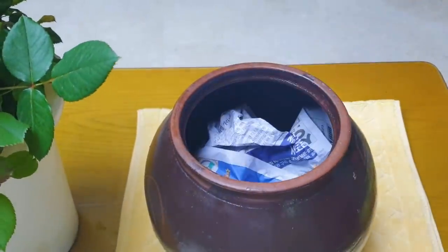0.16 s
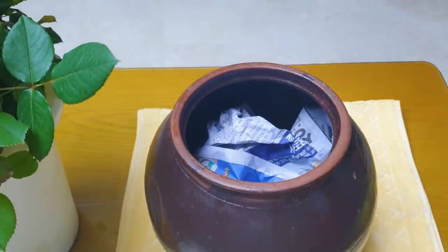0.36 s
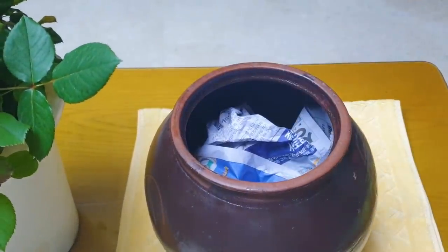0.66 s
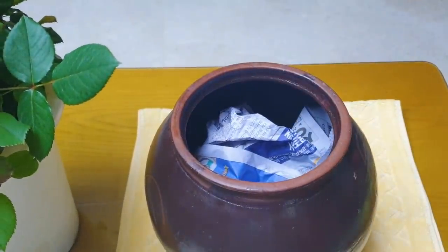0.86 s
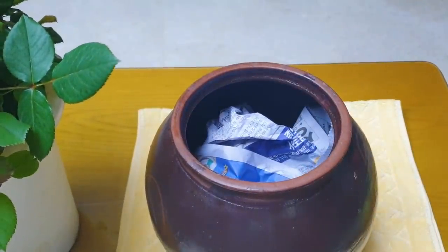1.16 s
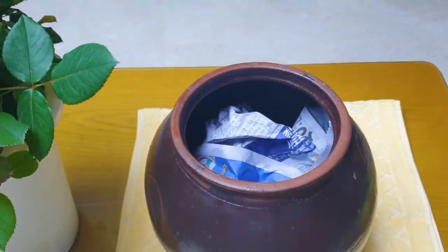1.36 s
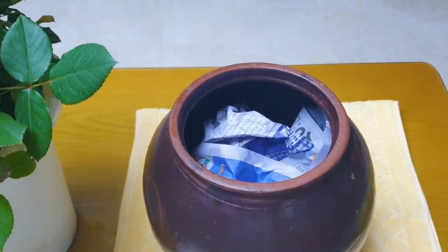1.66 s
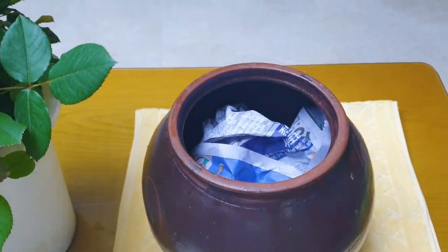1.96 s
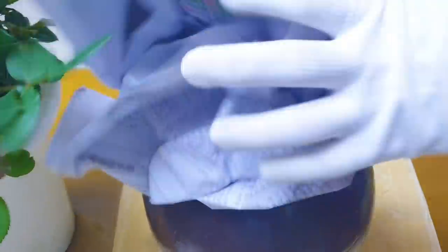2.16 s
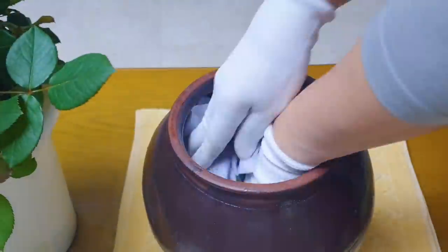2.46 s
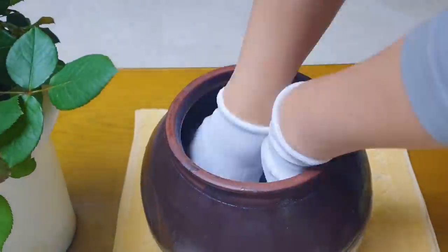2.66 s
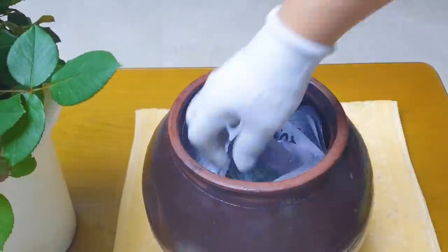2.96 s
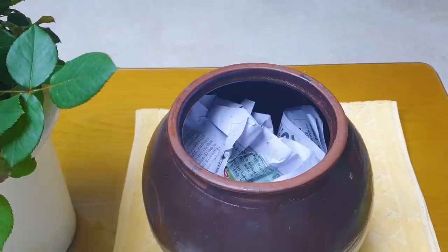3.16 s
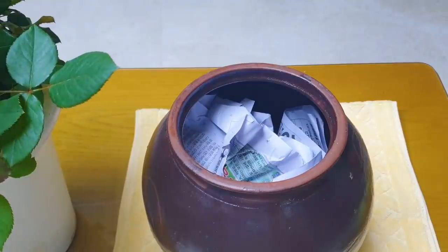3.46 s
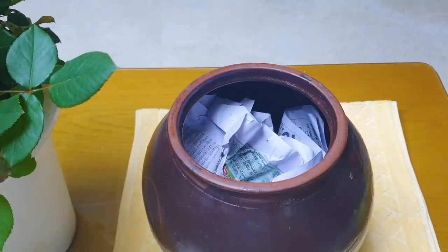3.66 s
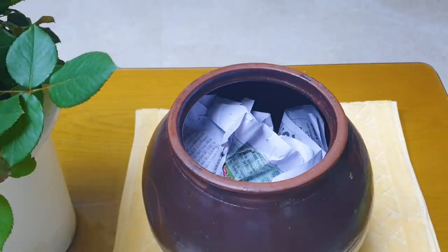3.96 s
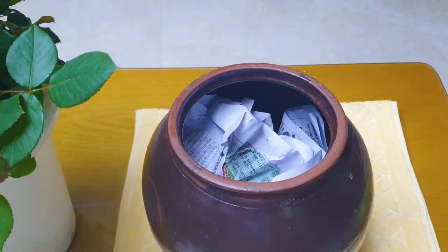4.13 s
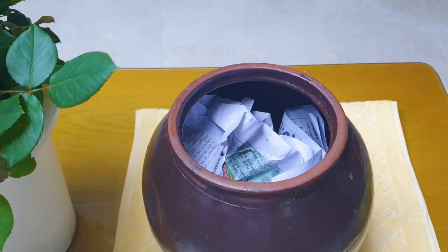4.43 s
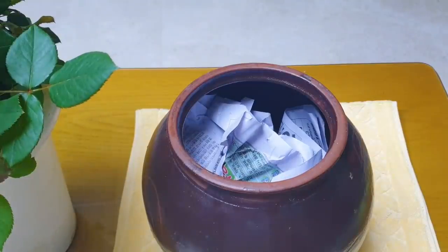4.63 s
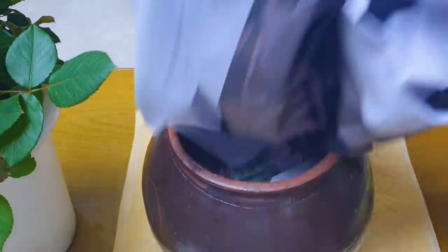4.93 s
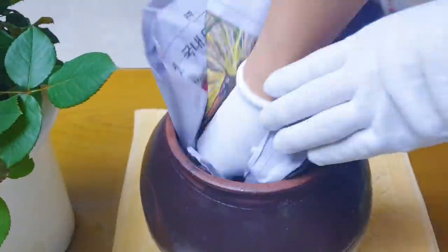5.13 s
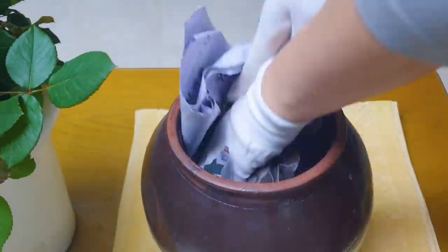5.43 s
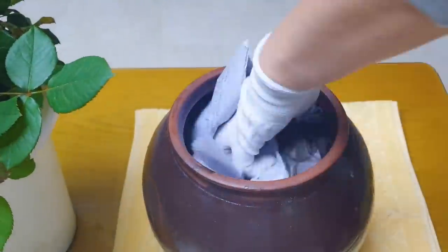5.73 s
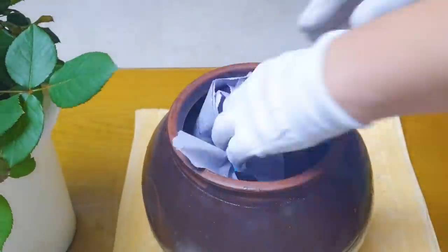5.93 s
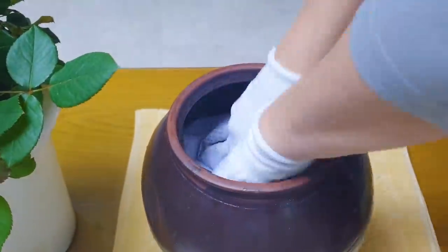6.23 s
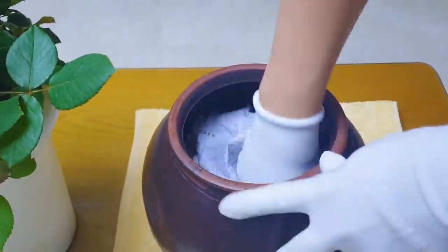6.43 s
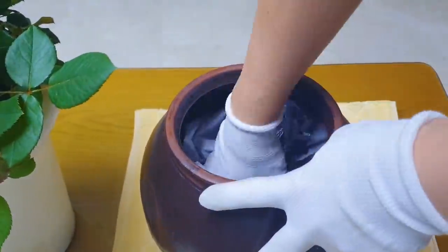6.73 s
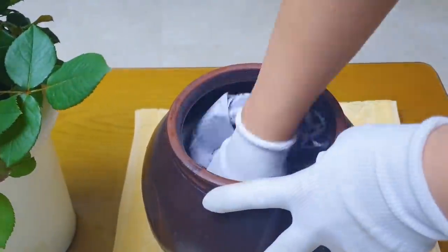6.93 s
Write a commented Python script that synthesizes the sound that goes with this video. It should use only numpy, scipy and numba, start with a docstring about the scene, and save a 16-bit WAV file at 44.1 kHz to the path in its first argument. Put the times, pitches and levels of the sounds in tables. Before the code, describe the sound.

A short, dull paper rustle with a soft hollow boom opens the sound, as a wad of damp newspaper settles in a ceramic jar. Small ticks follow over a faint hiss until about 1.2 seconds. From there hands crumple a sheet, the crisp crackle growing loud near 2 seconds. Between 2.1 and 3 seconds it is pushed into the jar in jerky, fading strokes, with hollow scrapes, sharp snaps and a few dull knocks. A lull with faint ticks lasts until about 3.6 seconds. A second sheet is then gathered and crushed, building from 4.2 seconds to the loudest crunch around 5 seconds, where it enters the jar with a few more bumps. Softer pushes, crinkles and hollow scraping continue until about 7 seconds. Everything is close to the microphone, in a quiet room with a very faint hum.

```python
"""Stuffing a jar with damp newspaper

Close up, gloved hands crumple damp newspaper into a glazed jar on a table. A pressed wad settles
with small ticks; two more sheets are gathered, crushed at the rim and pushed down. Creases buckle
as tiny grains, sheets slide and flap, and the jar's cavity colours what happens inside it."""
import sys
import numpy as np
from scipy import signal
from scipy.fft import rfft, irfft
from scipy.io import wavfile
from scipy.ndimage import map_coordinates
from numba import njit

SR = 44100
rng = np.random.default_rng(int(sys.argv[2]) if len(sys.argv) > 2 else 0)


def unload_wav(signal):
    """Save mono or channel-first audio to the path in sys.argv[1] as 16-bit WAV at rate SR, clipped to [-1, 1]."""
    wavfile.write(
        sys.argv[1],
        SR,
        np.round(np.clip(np.atleast_2d(signal).T, -1, 1) * 32767).astype(np.int16),
    )


N = 312880
TIME = np.arange(N) / SR
# Hands push paper into the jar. Each row: start and length in seconds, crease level and swell in dB,
# folds, flap and sheen in dB relative to the creases, cavity level in dB, cavity resonance in Hz
# (lower as the arms close the mouth).
PUSHES = [(2.145, 0.069, -20.5, 4, -7.5, -21.5, -3, -28, 673),
          (2.216, .15, -21, -3.5, -7, -22, -3.5, -32.5, 565),
          (2.373, .12, -25.5, -3.5, -12, -33, -0.5, -32.5, 660),
          (2.513, 0.068, -27.5, -9.5, -5, -32, 2.5, -36.5, 697),
          (2.586, 0.06, -36.5, -9, -9, -29, -5, -43, 642),
          (2.645, 0.066, -33.5, -3, -7.5, -34, -5.5, -38, 620),
          (2.758, .17, -40, 11.5, -7, -35, -1, -47, 718),
          (2.98, .057, -41.5, -1.5, -8, -39.5, 2.5, -46, 727),
          (3.046, 0.022, -46.5, 0, 3.5, -5.5, 2, -56, 646),
          (5.015, 0.046, -16.5, 4, -8.5, -22, -6.5, -23, 665),
          (5.074, 0.12, -24, -9.5, -7, -24, -6, -39, 640),
          (5.156, 0.082, -21, -0.5, -7, -23, -6.5, -27, 520),
          (5.287, 0.078, -22.5, -4, -12.5, -23.5, -1.5, -35.5, 613),
          (5.367, .17, -26, 0, -9.5, -28, -2.5, -40.5, 664),
          (5.564, 0.063, -35, -1.5, -8.5, -24, 1.5, -41, 662),
          (5.648, 0.15, -33, -7, -8.5, -26, -4, -41, 583), (5.794, 0.1, -30, -3, -8, -28.5, 3.5, -38, 630),
          (5.953, 0.063, -37.5, -1.5, -5.5, -23.5, 1.5, -41, 696),
          (6.064, 0.068, -34, -6.5, -7, -28, 0.5, -39, 630),
          (6.153, .1, -37, -0.5, -5.5, -24.5, -2, -43.5, 670),
          (6.313, 0.084, -44, -1, -2, -22, -1, -45, 643),
          (6.41, 0.14, -40.5, 4.5, -3.5, -23, 1.5, -43, 676),
          (6.597, 0.073, -39.5, 4.5, -5.5, -34, 1.5, -41, 670),
          (6.695, .13, -36.5, -4, -6.5, -25, -.5, -38, 663), (6.864, 0.056, -39, 3, -4, -25, 0, -42.5, 690),
          (6.951, 0.043, -34, -2, -6.5, -30, -1, -34, 654), (7.029, 0.095, -43, -1, 1, -20, 2, -43, 644)]


def undb(db):
    return 10 ** (np.asarray(db) / 20)


def butter(x, order, hz, kind):
    return signal.sosfilt(signal.butter(order, hz, kind, fs=SR, output="sos"), x)


def during(start, end, fade=0.0082):
    """A gate, open between two times, with short fades outside them."""
    return np.interp(TIME, [start - fade, start, end, end + fade], [0, 1, 1, 0])


def colour(x, points):
    """Equalise a sound along a curve of (Hz, dB) points."""
    hz, db = np.transpose(points)
    gain_db = np.interp(np.log(np.fft.rfftfreq(N, 1 / SR) + 1), np.log(hz), db)
    return irfft(rfft(x) * undb(gain_db), N)


def unit(x, lo_hz=20, hi_hz=16000):
    """Scale a stereo sound so that its middle has rms 1 within a band."""
    power = np.abs(rfft(x.mean(0))[lo_hz * N // SR:hi_hz * N // SR]) ** 2
    return x * N / np.sqrt(2 * power.sum())


def walk(rate):
    """Random wander with a spread near 1, turning rate times a second."""
    knots = rng.standard_normal(4096)
    return np.interp(TIME * rate, np.arange(len(knots)), knots) * np.sqrt(3 / 2)


def noise(split_hz):
    """Stereo noise, alike in both ears below split_hz and unrelated above."""
    mid, side = rng.standard_normal((2, N))
    side = butter(side, 1, split_hz, "high")
    return np.array([mid + side, mid - side])


def late(x, ms):
    """Delay one channel by a time that may change."""
    return map_coordinates(x, [(TIME - ms / 1000) * SR], order=3)


@njit
def svf(x, hz, width):
    """Band-pass whose centre may move, gain 1 at the centre."""
    y, band_state, low_state = np.empty(len(x)), 0., 0.
    for i in range(len(x)):
        g, damping = np.tan(np.pi * hz[i] / SR), width / hz[i]
        band = (band_state + g * (x[i] - low_state)) / (1 + g * (g + damping))
        band_state = 2 * band - band_state
        low_state += 2 * g * band
        y[i] = damping * band
    return y


def resonate(x, hz, width_hz):
    """One resonance on both channels."""
    return np.array([svf(np.ascontiguousarray(ear), hz + np.zeros(N), float(width_hz)) for ear in x])


@njit
def grains(start, hz, size, cycles):
    """Damped sines, each falling to 1/e in the given number of cycles."""
    y = np.zeros(N)
    for k in range(len(start)):
        first = int(start[k] * SR) + 1
        step = (2j * np.pi - 1 / cycles) * hz[k] / SR
        phasor, turn = size[k] * np.exp(step * (first - start[k] * SR)), np.exp(step)
        for i in range(max(first, 0), min(N, first + int(6 * cycles * SR / hz[k]))):
            y[i] += phasor.imag
            phasor *= turn
    return y


def crackle(rate, lo_hz, hi_hz, spread_db, cycles, scatter_ms, pan_db):
    """Creases buckle at random: each has its own pitch, size and spot on the sheet."""
    pool, count = 90000, int(rate * N / SR)
    when, pitch, polarity = rng.random((pool, 3))[:count].T
    strength, offset, side = rng.standard_normal((pool, 3))[:count].T
    hz = lo_hz * (hi_hz / lo_hz) ** pitch
    size = hz * undb(spread_db * np.minimum(strength, 2.7)) * np.sign(polarity - .5)
    start, lag = when * N / SR, scatter_ms * offset / 1000
    out = np.array([grains(start + ear * lag / 2, hz, size * undb(ear * pan_db * side / 2), cycles)
                    for ear in (1, -1)])
    return out / out.std()


def strokes(start, length, swell_db, db):
    """Stroke envelopes, added in power: a quick rise, a swell or sag, a release with a faint tail."""
    attack_s, release_s = 0.019, 0.022
    relax_db, relax_s = -19, .05  # the creases go on relaxing
    power = np.zeros(N)
    for s, span, swell, level_db in zip(start, length, swell_db, db):
        near = slice(max(int(s * SR), 0), int((s + span + 10 * relax_s) * SR))
        t = TIME[near] - s
        after = np.maximum(t - span, 0)
        rise = np.clip(t / attack_s, 0, 1)
        fall = np.maximum(np.exp(-after / release_s), undb(relax_db) * np.exp(-after / relax_s))
        level = undb(level_db + swell * (np.clip(t / span, 0, 1) - .5))
        power[near] += (rise * fall * level) ** 2
    return np.sqrt(power)


def strikes(rows, decay_s, width, skirt_db, gain_db):
    """Short noise bursts around each row's pitch, with a faint broadband crack."""
    out = np.zeros((2, N + SR))
    t = TIME[:SR // 10]
    for s, db, hz, pan_db in rows:
        shared, own = rng.standard_normal(len(t)), rng.standard_normal((2, len(t)))
        push = (shared + own * hz / 14000) * np.exp(-t / decay_s)
        band_hz = [hz / (1 + width), min(hz * (1 + 2 * width), SR / 2.3)]
        burst = butter(push, 2, band_hz, "band") + undb(skirt_db) * butter(push, 1, 300, "high")
        ear_gains = undb(db + gain_db + np.array([[pan_db], [-pan_db]]) / 2)
        first = int(s * SR)
        out[:, first:first + len(t)] += burst / np.abs(burst.mean(0)).max() * ear_gains
    return out[:, :N]


def background():
    """Faint air and hum; a louder hiss with a low rumble lasts just over the first second."""
    # Tone of the air and of the hiss. Each row: frequency in Hz, gain in dB.
    air_eq = [(18, -57), (30, -26), (134, -18), (165, -6.5), (210, -16), (252, -6), (374, -23.5),
              (512, -23.5), (702, -27.5), (5590, -30.5), (16000, -26)]
    hiss_eq = [(25, -17), (55, -1), (85, -2), (153, -17), (270, -29), (384, -22), (640, -11), (1100, -24),
               (2700, -10.5), (4500, -10), (7200, -8.5), (9300, -17.5), (13000, -15), (16000, -44)]
    # Partials of the hum. Each row: pitch in Hz, level in dB.
    partials = [(167, -76), (247.6, -84.5), (511, -78)]
    air = unit(colour(noise(700), air_eq)) * undb(-65)
    hum = sum(undb(db) * np.sqrt(2) * np.sin(2 * np.pi * hz * TIME + .5 * walk(24)) for hz, db in partials)
    hiss = unit(colour(noise(150), hiss_eq)) * undb(-56) * during(0, 1.22)
    return air + hum + hiss


def settling():
    """The released wad relaxes with a dull rustle and the open jar booms at its neck resonance."""
    # The wad lets go in stages. Each row: start and length in seconds, then rustle, swell and boom in dB.
    stages = [(-.03, 0.14, -35, -7, -42), (0.099, 0.29, -51.5, 0.5, -54.5), (0.41, 0.32, -56.5, -9, -65.5),
              (0.823, 0.24, -63.5, -5, -78)]
    # Tone of the wad. Each row: frequency in Hz, gain in dB.
    wad_eq = [(190, -39), (330, -2.5), (640, 1.5), (980, -4.5), (1300, -3), (2900, -4.5), (5000, -8.5),
              (7500, -7.5), (9000, -14), (13500, -12), (16000, -24)]
    neck_hz = 243
    start, length, rustle_db, swell_db, boom_db = np.transpose(stages)
    buckles = crackle(rate=5400, lo_hz=337, hi_hz=14900, spread_db=7.5, cycles=1.7,
                      scatter_ms=0.064, pan_db=4.5)
    rustle = unit(colour(buckles + undb(-4.5) * noise(4000), wad_eq), 600, 8000)
    boom = unit(resonate(resonate(noise(2200), neck_hz, 60), neck_hz, 100))
    return (rustle * strokes(start, length, swell_db, rustle_db)
            + boom * strokes(start, length, swell_db, boom_db))


def snaps():
    """Single creases snap with a sharp tick."""
    # Each row: start in seconds, relative peak in dB, pitch in Hz, left minus right in dB.
    ticks = [(.0795, -19.5, 2680, -1), (.125, -26, 2410, -1), (.183, -33, 3480, 0), (.1923, -30, 2920, 1),
             (.243, -28, 3100, 0), (.297, -26, 3100, 1), (.3586, -34.5, 2380, 1), (.4398, -27.5, 2400, 1),
             (.4758, -32, 2800, 3), (.4938, -26, 2940, 0), (.5437, -38, 4750, 1), (.6434, -33, 3600, -3),
             (.6527, -36.5, 3200, -2), (.834, -26, 4850, 1), (.9503, -35, 4200, -4),
             (1.1076, -39, 3360, 10), (1.12, -27, 3900, 1), (1.7862, -22.5, 4970, -7),
             (2.472, -10, 6650, 9), (2.5456, -4.5, 11100, 0), (2.5606, -12, 5230, 8),
             (2.9134, -17, 6310, 1), (3.0878, -27.5, 3370, 0), (3.267, -37, 7500, 0),
             (3.3338, -34, 11800, 2), (3.616, -27.5, 2730, 8), (3.7676, -21.5, 12700, 3),
             (4.0276, -30, 7540, 0), (4.0636, -26, 7600, -1), (4.0856, -22, 7500, 0), (4.4762, -8, 5500, 1),
             (4.7742, -20, 8200, -3), (4.9255, -8, 9000, -10), (5.3536, -9, 4940, 3),
             (5.4716, -12, 3600, 0), (5.7454, -10.5, 11100, -1), (5.9404, -19, 9960, 0),
             (5.9984, -11, 6900, 5), (6.0797, -37, 2550, -1), (6.4173, -21, 12100, -3),
             (6.4217, -19, 3050, -1), (6.4892, -17.5, 2430, 1), (6.5426, -19, 13600, 3),
             (6.6184, -30, 8410, -9.5), (6.708, -21, 9200, 2), (6.9294, -25.5, 3600, 2),
             (6.9623, -21, 12200, 0)]
    return strikes(ticks, decay_s=0.001, width=0.62, skirt_db=-14, gain_db=0.6)


def cavity(x):
    """The jar's air: a broad resonance that the arms shift from push to push, ringing in narrow modes."""
    # Air modes of the jar. Each row: pitch in Hz, width in Hz, gain in dB.
    modes = [(446, 8, 8.5), (506, 19, 4.5), (615, 18, -2), (736, 28, -0.5), (842, 39, 7.5)]
    start, length, *_, mouth_hz = np.transpose(PUSHES)
    centre_hz = np.interp(TIME, start + length / 2, mouth_hz)
    air = resonate(resonate(x, centre_hz, 180), centre_hz, 290)
    return air + sum(undb(db) * resonate(air, hz, width) for hz, width, db in modes)


def jerks(rate, spread_db, decay_s, steady):
    """Paper gives way in fits: each starts at once and dies away over a steady slide."""
    jitter, strength = rng.random((2000, 2))[:int(rate * N / SR)].T
    onsets = np.minimum((np.arange(len(jitter)) + jitter) * SR / rate, N - 1).astype(int)
    kicks = np.zeros(N)
    np.add.at(kicks, onsets, undb(spread_db * strength))
    fits = signal.lfilter([1], [1, -np.exp(-1 / (decay_s * SR))], kicks)
    fits = fits + steady * fits.mean()
    return fits / np.sqrt(np.mean(fits ** 2))


def facets(x, rate, width_hz, depth_db):
    """The facets of a crumpling sheet keep changing size, so ever new pitch regions stand out."""
    hz, s, spectra = signal.stft(x, SR, nperseg=512)
    field = rng.standard_normal((256, 512))
    region = np.log1p(hz / 2500) * 2500 / width_hz  # regions widen towards the treble
    ripple = map_coordinates(field, np.meshgrid(region, s * rate, indexing="ij"), order=3, mode="wrap")
    return signal.istft(spectra * undb(depth_db * ripple), SR, nperseg=512)[1][:, :N]


def bounce(x):
    """A reflection off the nearest moving glove or flap sweeps broad notches through the rustle."""
    delay_ms, gain = 0.2173 * 2 ** (0.728 * walk(11)), undb(-14)
    reflection = np.array([late(ear, delay_ms) for ear in x])
    return (x + gain * reflection) / np.hypot(1, gain)


def sharp_creases(give, sheen_db):
    """Fine creases buckle in a bright crackle; stiffer ones give way on their own."""
    # Tone of the fine creases. Each row: frequency in Hz, gain in dB.
    crisp_eq = [(1200, -40), (2500, -8.5), (3600, -3), (6500, -1), (10000, -1.5), (12500, -1), (16000, -7)]
    fine = crackle(rate=5500, lo_hz=1980, hi_hz=16250, spread_db=6.5, cycles=1.6,
                   scatter_ms=0.0099, pan_db=5)
    crisp = facets(fine + undb(0.5) * noise(7500), rate=22, width_hz=528, depth_db=1.0)
    crisp = bounce(colour(crisp * give, crisp_eq))
    sheen = signal.sosfiltfilt(signal.butter(2, 9000, "high", fs=SR, output="sos"), crisp)
    tilted = crisp + (undb(sheen_db) - 1) * sheen
    crisp = unit(tilted, 3500, 16000) * undb(-.3 * sheen_db)  # offset the level that the sheen adds
    stiff = crackle(rate=110, lo_hz=1900, hi_hz=6000, spread_db=3.0, cycles=2.4,
                    scatter_ms=0.026, pan_db=5.5)
    return crisp + undb(-13.5) * butter(stiff, 2, 900, "high")


def wet_folds(give):
    """Thick, wet folds buckle with a midrange crunch."""
    # Tone of the folds. Each row: frequency in Hz, gain in dB.
    fold_eq = [(350, -25), (700, -6.5), (1100, 0.5), (1500, 1), (2300, 3.5), (3200, -3), (5500, -2.5),
               (12000, -48.5)]
    buckles = crackle(rate=3200, lo_hz=620, hi_hz=4150, spread_db=4.0, cycles=2.5,
                      scatter_ms=0.025, pan_db=1.5)
    crunch = bounce(facets(buckles + noise(4800), rate=19, width_hz=292, depth_db=0.5))
    return unit(colour(crunch * give * undb(0.97 * walk(90)), fold_eq), 1000, 3000)


def flapping(give):
    """The moving sheet flaps low, and its draught reaches each ear on its own."""
    # Tone of the flap. Each row: frequency in Hz, gain in dB.
    flap_eq = [(25, -29), (60, -28), (110, -8), (170, -3.5), (280, 5), (480, 9), (700, 4.5), (1200, -11),
               (3000, -52.5)]
    draught = butter(rng.standard_normal((2, N)), 1, 80, "low")
    flutter = (noise(2200) + undb(2.0) * draught) * give * undb(2.0 * walk(45))
    return unit(colour(flutter, flap_eq), 130, 400)


def crumpling():
    """With each grip and push, creases, folds and flap all move in the same small jerks."""
    # Hands gather a sheet in the open. Each row: start and length in seconds, crease level and swell
    # in dB, then folds, flap and sheen in dB relative to the creases.
    grips = [(1.089, 0.13, -43.5, 1, 1, -14, -10.5), (1.241, 0.25, -37.5, 5, -8, -30, 1),
             (1.447, 0.22, -35.5, -4, -5.5, -23, 0), (1.554, .17, -29.5, -4.5, -8, -25, -2),
             (1.753, 0.15, -35, 19, -7, -28, -2), (1.852, 0.049, -25, 4, -7.5, -22.5, -2.5),
             (1.912, 0.061, -21.5, -5, -6.5, -23.5, 3.5), (1.974, 0.16, -21.5, 1, -9, -23, -1.5),
             (3.088, 0.12, -59, -2, -.5, -30, 4.5), (3.253, 0.098, -59.5, -6, -12.5, -15, 0.5),
             (3.364, .029, -51, -3, -12.5, -19, 7), (3.571, 0.041, -49, 5.5, -20, -34, 5),
             (3.604, 0.088, -39.5, 14, -5.5, -24, 1.5), (3.716, 0.15, -45, -18, -6.5, -32, -2),
             (3.872, 0.18, -48, -26.5, -6.5, -29, 2), (4.039, 0.054, -40.5, 9, -7, -25.5, -8),
             (4.101, 0.05, -45, -6, -5, -18, 3.5), (4.164, 0.042, -32, -10, -6.5, -26, 3),
             (4.203, 0.071, -26.5, 8.5, -11, -25, -2.5), (4.281, .18, -32.5, -7, -6, -23, 0),
             (4.455, .095, -27.5, 6, -6.5, -25, 0.5), (4.562, 0.19, -26, -17, -7.5, -25, -5),
             (4.711, 0.071, -22.5, 4.5, -5.5, -25, -6), (4.795, 0.1, -24, -1.5, -4, -23, -4.5),
             (4.868, 0.1, -36, 11.5, -3, -18.5, -5)]
    # Each sheet drifts right and back to the middle. Each row: time in seconds, left-ear lag in ms.
    path = [(1.3, -0.013), (1.7, 0.11), (1.9, 0.2), (2.1, .11), (2.2, -0.038), (3.3, 0.041), (4.25, -0.046),
            (4.9, 0.16), (5.05, 0.057), (7.0, -0.018)]
    moves = sorted([tuple(grip) for grip in grips] + [tuple(push[:-2]) for push in PUSHES])
    start, length, crease_db, swell_db, folds_db, flap_db, sheens = np.transpose(moves)
    sheen_db = np.interp(TIME, start + length / 2, sheens)
    give = jerks(rate=93, spread_db=9.5, decay_s=0.01, steady=5.1)
    give *= undb(0.87 * walk(120) + 0.52 * walk(35))
    layers = (sharp_creases(give, sheen_db), 0), (wet_folds(give), folds_db), (flapping(give), flap_db)
    sound = sum(layer * strokes(start, length, swell_db, crease_db + db) for layer, db in layers)
    sound[0] = late(sound[0], np.interp(TIME, *np.transpose(path)))
    return sound


def stuffing():
    """Paper sticks and slips on the jar's inner wall, a hollow scrape heard through the mouth."""
    # The jar's fainter upper resonances. Each row: pitch in Hz, width in Hz, gain in dB.
    upper_modes = [(1570, 82, -7), (2100, 66, -17), (2350, 170, -24)]
    start, length, _, swell_db, *_, cavity_db, _ = np.transpose(PUSHES)
    scrape = crackle(rate=2500, lo_hz=272, hi_hz=2860, spread_db=2.5, cycles=0.66,
                     scatter_ms=.03, pan_db=-4.5)
    scrape *= jerks(rate=55, spread_db=11, decay_s=0.009, steady=2.2)
    hollow = cavity(scrape) + sum(undb(db) * resonate(scrape, hz, width) for hz, width, db in upper_modes)
    return unit(hollow, 470, 880) * strokes(start, length, swell_db, cavity_db)


def bumps():
    """The wad or a knuckle bumps the jar with a dull knock, centred between the ears."""
    # Each row: start in seconds, relative peak in dB, pitch in Hz.
    hits = [(2.168, -34, 135), (2.181, -34, 720), (2.194, -19, 660), (2.334, -13, 545), (2.543, -18, 686),
            (3.062, -27.5, 1100), (4.929, -19.5, 910), (5.033, -25, 720), (5.176, -14, 534),
            (6.08, -38, 298)]
    return strikes([(*hit, 0) for hit in hits], decay_s=0.0081, width=0.14, skirt_db=-50.5, gain_db=-2.5)


def room(x, near_t60=0.018, near_db=-13, wall_t60=.33, wall_db=-18):
    """Quick reflections from the table and the jar, then a short, soft tail from the walls."""
    t = TIME[:SR // 2]
    out = x
    for t60, db, lo_hz in ((near_t60, near_db, 1200), (wall_t60, wall_db, 300)):
        tail = noise(2300)[:, :len(t)] * np.exp(-np.log(1000) * t / t60) * (t > .002)
        tail = butter(tail, 1, [lo_hz, 8000], "band")
        tail /= np.sqrt((tail ** 2).sum(1, keepdims=True))
        out = out + undb(db) * signal.fftconvolve(x, tail, axes=1)[:, :N]
    return out


def scene():
    """Paper and jar in the room over the faint background, leaning slightly right."""
    ticks, knocks = snaps(), bumps()
    # the first wad lies deep in the jar, so its ticks ring the cavity
    ringing = undb(16.5) * cavity(ticks * during(.1, .7))
    action = room(crumpling() + stuffing() + settling() + ticks + ringing + knocks)
    return (action + background()) * undb([[-.4], [.4]])


def record(dry):
    """Soft saturation rounds the tallest peaks and a steep low-pass cuts the highest treble."""
    top_hz = 16150
    return signal.sosfilt(signal.ellip(10, .2, 80, top_hz, fs=SR, output="sos"), np.tanh(dry))


dry = scene()
out = record(dry)
unload_wav(out)
```